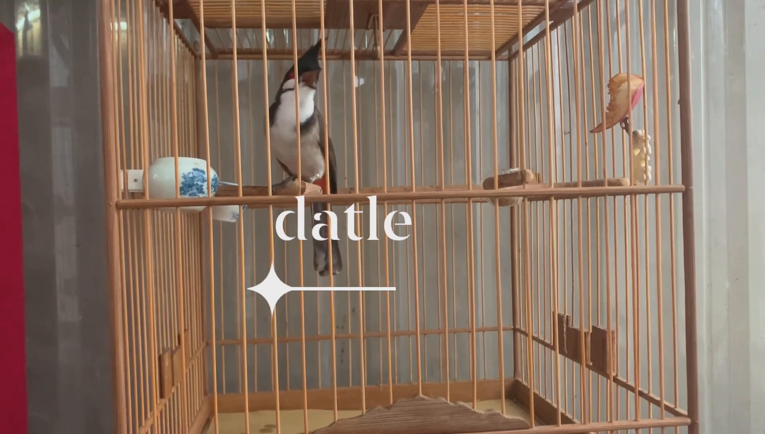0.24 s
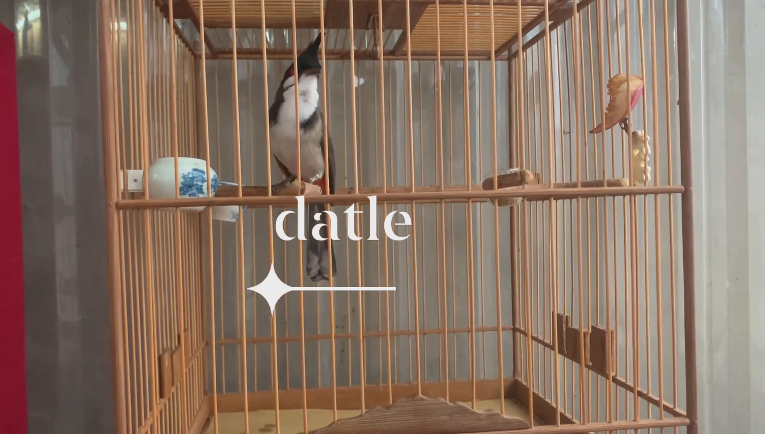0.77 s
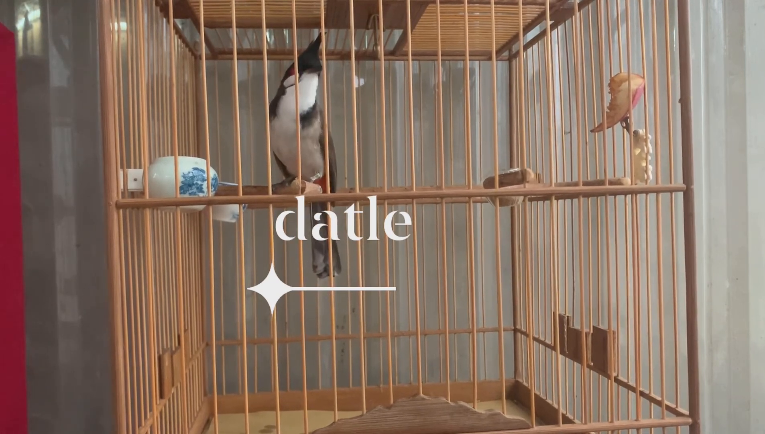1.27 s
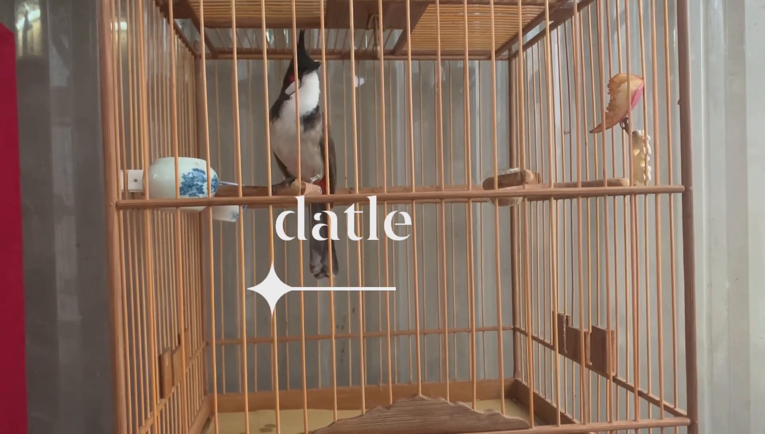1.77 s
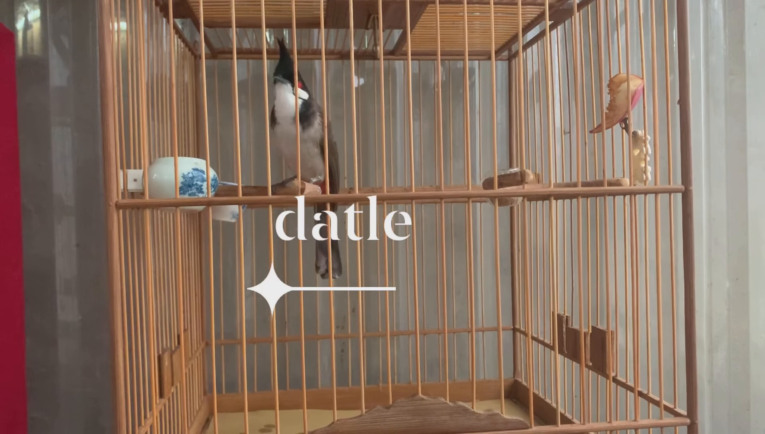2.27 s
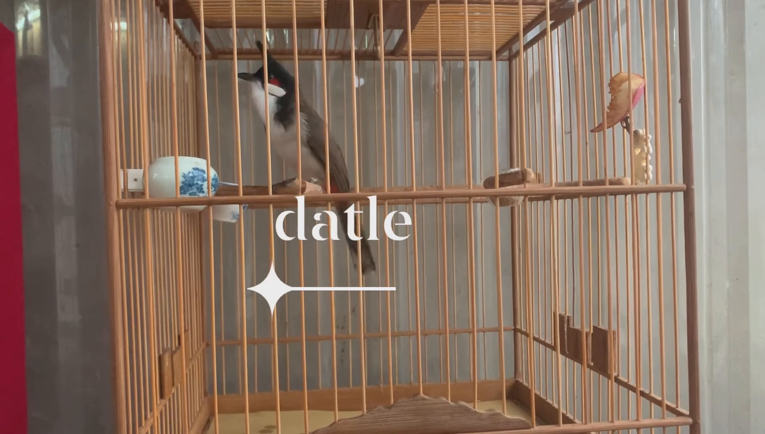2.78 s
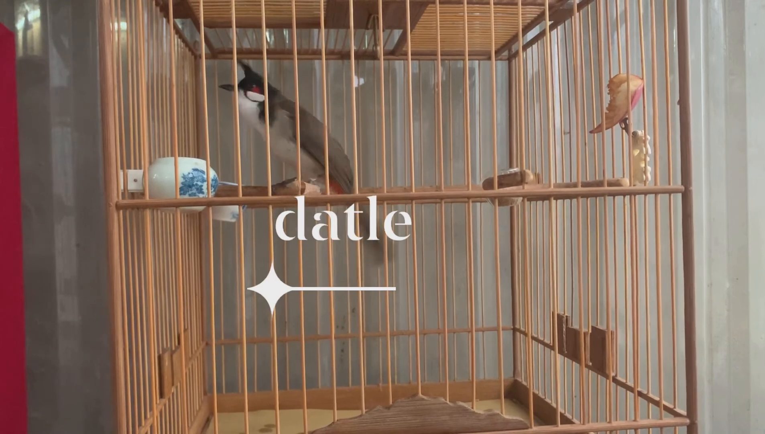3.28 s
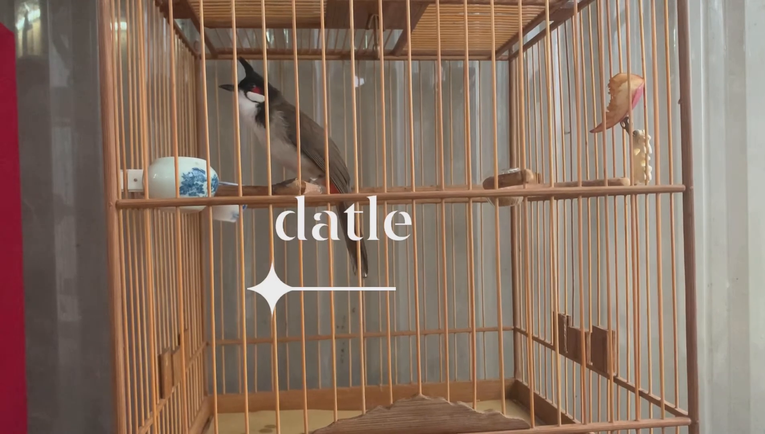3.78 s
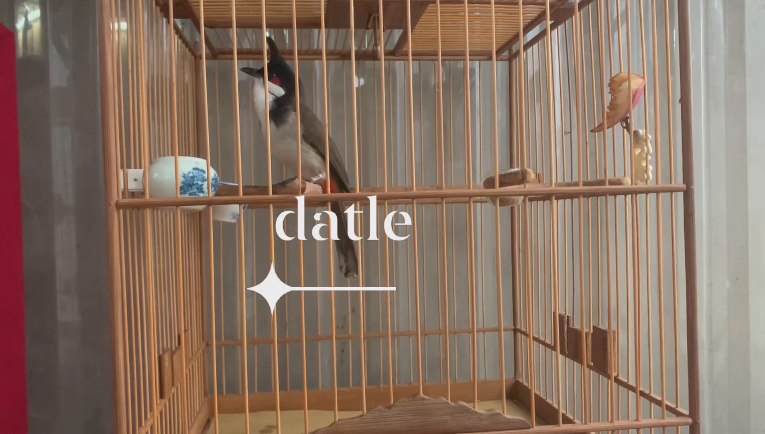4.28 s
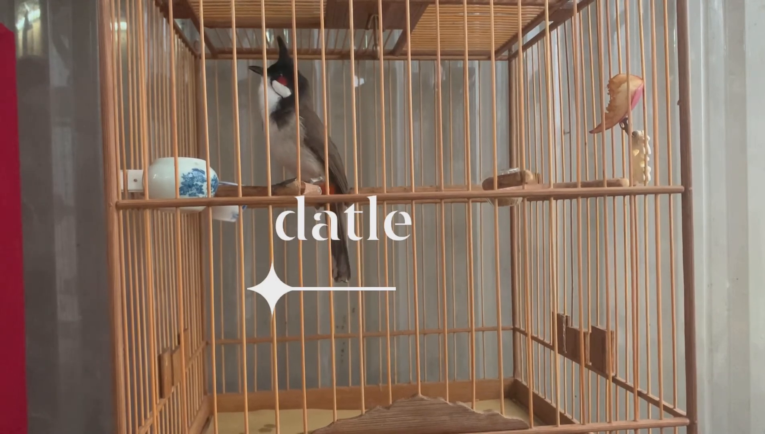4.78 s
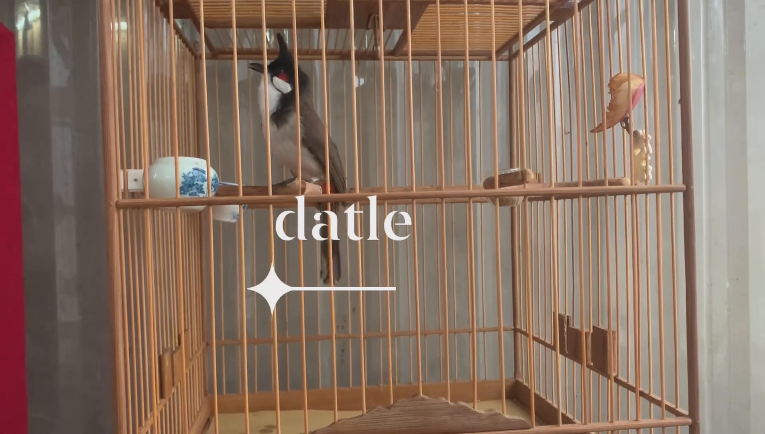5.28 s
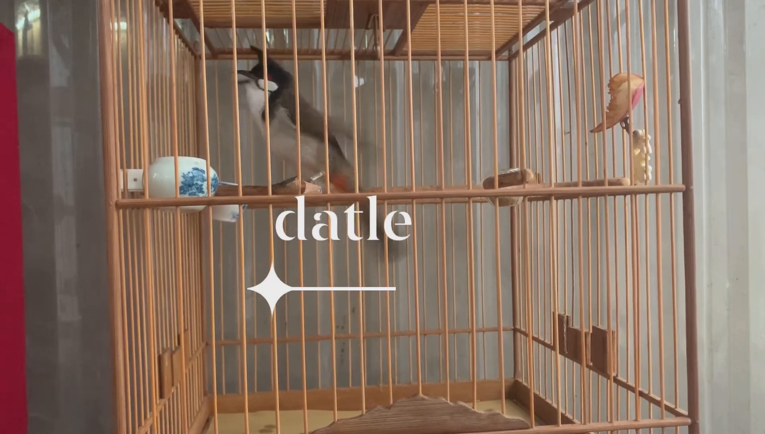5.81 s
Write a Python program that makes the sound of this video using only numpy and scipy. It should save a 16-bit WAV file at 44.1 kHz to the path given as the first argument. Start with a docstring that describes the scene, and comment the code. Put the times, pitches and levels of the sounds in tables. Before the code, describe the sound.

Close stereo pickup of a caged bird in a reverberant room above quiet street rumble. The fading wash of an earlier call leads into fast fluting whistles while a car horn honks faintly outside. The phrases relax into sliding notes, stop briefly, return with a small two-note figure, then, after a gap with distant birds and a bright chip, resume in strong whipped whistles with ringing echoes.

```python
"""A bulbul sings in a bamboo cage in a hard-walled room, over street rumble and steady hiss (shaped noise).
First a wash of an earlier call dies away as a distant two-tone car horn (wavering sines) swells and sinks.
Whips, slurs, shaken warbles and held whistles, at times from both sides of the syrinx, are gliding sines with
weak overtones and rasp; two sharp chips fall among them. Soft hiss returns near 2.3 s, far birds call from
3.2 to 3.9 s, and the song runs on to the end. Near walls, the room and a few ringing resonances answer it."""
import sys
import numpy as np
from scipy import signal
from scipy.fft import rfft, irfft, next_fast_len
from scipy.io import wavfile
from scipy.ndimage import uniform_filter1d, minimum_filter1d, map_coordinates

SR = 44100
rng = np.random.default_rng(int(sys.argv[2]) if len(sys.argv) > 2 else 0)


def to_wav(s):
    """Save 16-bit WAV."""
    ch = np.atleast_2d(s).T  # columns
    pcm = np.round(np.clip(ch, -1, 1) * 32767)  # PCM
    wavfile.write(sys.argv[1], SR, pcm.astype(np.int16))


N = 266805


def amp(db):
    """Decibels to gain."""
    return 10 ** (np.asarray(db) / 20)


def unit(x):
    """Scale to rms 1."""
    return x / np.sqrt(np.mean(x ** 2) + 1e-20)


def along(points, hz):
    """(Hz, value) points read on a log frequency axis."""
    f, v = np.transpose(points)
    return np.interp(np.log(hz + 1), np.log(f + 1), v)


def clock():
    """The time of each sample in seconds."""
    return np.arange(N) / SR


def level_over_time(points):
    """Gain that follows (s, dB) points in straight lines of dB."""
    return amp(np.interp(clock(), *np.transpose(points)))


def wobble(rate):
    """A smooth random curve, rate knots a second."""
    knots = rng.standard_normal(int(N * rate / SR) + 4)
    return map_coordinates(knots, [clock() * rate])


def filtered(x, response):
    """x passed through a complex response of frequency."""
    m = next_fast_len(N + SR // 2)
    hz = np.fft.rfftfreq(m, 1 / SR)
    return irfft(rfft(x, m) * response(hz), m)[..., :N]


def gate(t, start, end, edge):
    """1 between start and end, with soft edges."""
    opening = np.clip(np.minimum(t - start, end - t) / edge + .5, 0, 1)
    return np.sin(np.pi / 2 * opening) ** 2


def rush(spectrum):
    """Stereo noise of rms 1: mid and side shares set how alike the ports are, nearly mono in the bass."""
    # likeness of the two microphone ports, clipped to 0..1: frequency_hz, correlation
    alike = [(60, 1.07), (380, 0.43), (2380, -4.5), (15000, 0.1)]

    def mid_and_side(hz):
        turn = np.arccos(np.clip(along(alike, hz), 0, 1)) / 2
        return amp(along(spectrum, hz)) * [np.cos(turn), np.sin(turn)]

    mid, side = filtered(rng.standard_normal((2, N)), mid_and_side)
    return unit(np.array([mid + side, mid - side]))


def room(x, early_db=5, early_t60=0.082):
    """Dense early reflections (t60 in s) give way to a tail that dies sooner in the treble."""
    # decay of the hard-walled room: frequency_hz, t60_s
    decay_times = [(300, 0.94), (2000, 0.77), (4000, 0.6), (8000, 0.62), (14000, 0.44)]
    hz, t, z = signal.stft(rng.standard_normal((2, SR)), SR, nperseg=256)
    late = amp(-60 * t / along(decay_times, hz)[:, None])
    early = amp(early_db - 60 * t / early_t60)
    tail = signal.istft(z * (late + early), SR, nperseg=256)[1]
    tail = tail / np.linalg.norm(tail[0])
    tail = np.pad(tail, ((0, 0), (SR // 150, 0)))  # the first reflections come 1/150 s late
    return signal.fftconvolve(x[None], tail, axes=1)[:, :N]


def air(air_db=-60):
    """A steady, faint hiss: shaped stereo noise."""
    # colour of the hiss: frequency_hz, relative_level_db
    colour = [(410, -12.5), (700, -1.5), (1590, -1), (2880, -6.5), (3410, -9.5), (4540, -17), (7340, -22.5),
              (8920, -16.5), (14800, -54.5), (15600, -52)]
    return amp(air_db) * rush(colour)


def traffic(tilt_db=1.4):
    """Rumble from outside: low stereo noise of drifting level, a little to the right."""
    # level of the rumble before the tilt: time_s, level_db
    drift = [(0.0, -45.5), (0.641, -51), (4.484, -45), (4.718, -52.5), (5.324, -44), (6.05, -48.5)]
    # colour of the rumble: frequency_hz, relative_level_db
    colour = [(15, -60.5), (25, -25.5), (54, 2.5), (96, -5.5), (128, 0.5), (192, -11), (323, -14.5),
              (492, -17.5), (525, -9.5), (560, -20), (1200, -29.5), (1560, -80), (2640, -120)]
    return level_over_time(drift) * rush(colour) * amp([[-tilt_db], [tilt_db]])


def horn(waver=0.018, fading_db=2):
    """Two horn tones with their overtones, each fading in and out on its way through the street."""
    # the two tones and their overtones, before the swell: pitch_hz, level_db
    partials = [(404, -54.5), (527, -52), (807, -62), (1052, -61), (1215, -57)]
    # swell of the whole blast: time_s, relative_level_db
    swell = [(.27, -14.5), (.38, -0.5), (.82, -0.5), (.95, -8), (1.25, -14), (1.601, -61.5)]
    tones = np.zeros(N)
    for hz, db in partials:
        level = amp(db + fading_db * wobble(19.27))
        cycles = hz * np.cumsum(1 + waver * wobble(43.34)) / SR
        tones += level * np.sin(2 * np.pi * cycles)
    blast = np.sqrt(2) * tones * level_over_time(swell)
    return blast + .5 * room(blast)


def far_birds():
    """Distant calls, sines that glide and waver, arrive only as reverberation."""
    # faint calls; waver is a share of the pitch, pitch that of mid-call:
    # start_s, end_s, pitch_hz, rise_hz_per_s, level_db, waver
    far_calls = [(3.17, 3.398, 2820, 1800, -57, 0.079), (3.624, 3.91, 3293, 1200, -52.5, .05),
                 (3.823, 3.93, 2410, 500, -49.5, .05)]
    t, calls, tremble = clock(), np.zeros(N), wobble(250)
    for start, end, hz, rise, db, waver in far_calls:
        pitch = (hz + rise * (t - (start + end) / 2)) * (1 + waver * tremble)
        phase = 2 * np.pi * np.cumsum(pitch) / SR
        calls += amp(db) * gate(t, start, end, 0.034) * np.sin(phase)
    return room(np.sqrt(2) * calls)


def soft_hiss():
    """A soft high hiss that comes and goes: shaped stereo noise."""
    # colour: frequency_hz, relative_level_db
    colour = [(2000, -14), (4500, -1), (9000, 0.5), (11200, -7.5), (13000, -10.5), (15500, -23)]
    # swell: time_s, level_db
    swell = [(0, -60.5), (.23, -66), (0.552, -65), (0.999, -86), (2.051, -82), (2.301, -69.5), (2.601, -85)]
    return level_over_time(swell) * rush(colour)


def earlier_call():
    """The wash of an earlier call dies away: stereo noise in a band of the song's pitch."""
    # colour: frequency_hz, relative_level_db
    colour = [(1500, -32.5), (2800, -15), (3600, 2), (3950, -8.5), (4400, -34)]
    # fade: time_s, level_db
    fade = [(0, -49.5), (.17, -52.5), (.26, -55), (0.601, -100)]
    return level_over_time(fade) * rush(colour)


def rings(x):
    """Narrow resonances store the notes that hit them and let go slowly, in a different phase at each port."""
    # resonances of the room: frequency_hz, t60_s, relative_level_db
    resonances = [(1637, .8, -2), (2125, .6, 0), (2240, .85, -5), (2778, .9, -2), (3882, .55, 3)]
    t = np.arange(SR) / SR
    phases = rng.uniform(0, np.pi / 2, (len(resonances), 2, 1))
    answer = np.zeros((2, SR))
    for (hz, t60, db), phase in zip(resonances, phases):
        even_out = 2 * np.log(1000) / (t60 * SR)  # long rings respond no louder than short ones
        answer += amp(db - 60 * t / t60) * even_out * np.sin(2 * np.pi * hz * t + phase)
    return signal.fftconvolve(x[None], answer, axes=1)[:, :N]


def ports(x, lead=5.98):
    """The direct sound and its near-wall copies reach the two microphone ports at different times."""
    # near walls: delay_s, gain, left_port_lead_samples
    walls = [(.004, 0.5, 3), (.00758, .27, -4.5), (0.0128, .2, 14.5)]

    def arrival(hz, delay, lag):
        port_delay = delay + np.array([[-.5], [.5]]) * lag / SR
        return np.exp(-2j * np.pi * hz * port_delay)

    def all_arrivals(hz):
        direct = arrival(hz, 0, lead)  # lead in samples
        return direct + sum(gain * arrival(hz, delay, lag) for delay, gain, lag in walls)

    return filtered(x, all_arrivals)


def chips(jitter=0.022):
    """Short, bright chips: clusters of partials that start at once and fade quickly."""
    # chips, before the gains of the scene: start_s, pitch_hz, level_db, t60_s
    sharp_chips = [(1.379, 4220, -41.5, 0.043), (3.513, 3886, -38, 0.2)]
    # their partials: pitch_multiple, relative_level_db
    partials = [(1, 9.5), (1.52, -13.5), (2, -6), (2.471, -19), (3.12, -24)]
    t, sound = clock(), np.zeros(N)
    cycles = np.cumsum(1 + jitter * wobble(600)) / SR
    for start, hz, db, t60 in sharp_chips:
        age = np.maximum(t - start, 0)
        level = amp(db - 60 * age / t60) * (1 - np.exp(-age / 0.0028))
        sound += level * sum(amp(k_db) * np.sin(2 * np.pi * k * hz * cycles) for k, k_db in partials)
    return np.sqrt(2) * sound


def whips(top_share=.8, ease=1.8, attack_s=0.018, attack_db=12, release_s=0.018, release_db=3.5):
    """The pitch shoots up, slows and tips over at the top, while the level swells, holds and sinks."""
    # upward whips; level is that of the hold, before the gains of the scene:
    # start_s, length_s, low_hz, top_hz, level_db, brightness_db
    upward_whips = [ (0.253, 0.044, 1650, 3580, -17, 0), (0.54, 0.043, 2347, 3496, -15, -1.5),
                    (1.249, 0.066, 2195, 3674, -23, -6), (3.949, 0.054, 1620, 4052, -15, 1),
                    (4.356, 0.044, 2150, 3866, -20, -5), (4.604, 0.061, 1782, 4137, -13.5, 2.5),
                    (4.912, 0.055, 2600, 3567, -29.5, 5), (4.986, 0.042, 2332, 3640, -29.5, -3),
                    (5.842, 0.058, 1806, 4122, -14, 3), ]
    for start, length, low_hz, top_hz, db, bright_db in upward_whips:
        age = np.arange(0, length, 1 / SR)
        climb = 1 - np.abs(1 - age / (top_share * length)) ** ease
        attack = attack_db * np.maximum(1 - age / attack_s, 0)
        release = release_db * np.maximum(1 - (length - age) / release_s, 0)
        yield start + age, low_hz * (top_hz / low_hz) ** climb, db - attack - release, bright_db, True


def slurs():
    """One smooth bend through three pitches that grows or fades evenly."""
    # slurred notes; level is that of mid-note, before the gains of the scene:
    # start_s, length_s, first_hz, middle_hz, last_hz, level_db, swell_over_note_db, brightness_db
    slurred_notes = [ (0.3, 0.043, 3310, 2898, 2798, -12, 5, -0.5),
                     (0.427, 0.037, 1790, 2330, 1713, -25.5, 5, -2.5),
                     (0.465, 0.027, 1910, 2473, 2650, -21, 7.5, -9.5),
                     (0.623, 0.036, 2052, 2150, 2704, -23, 11.5, -1),
                     (0.72, 0.008, 3760, 3430, 3400, -19.5, -2.5, -2.5),
                     (0.78, 0.028, 2814, 2751, 2590, -14, -5.5, -6.5),
                     (0.784, 0.085, 3032, 3810, 3886, -21.5, -3.5, 0.5),
                     (0.824, 0.047, 2155, 2142, 2015, -24, -4, -4.5),
                     (1.583, 0.11, 1857, 1930, 1690, -40.5, -3, 3),
                     (2.68, 0.048, 1274, 1537, 2013, -34.5, 19.5, 6.5),
                     (2.734, 0.0346, 2090, 2237, 1952, -19.5, -3, 1),
                     (4.786, 0.022, 1404, 1550, 1663, -41.5, 18, 3),
                     (5.117, 0.043, 1494, 1976, 2336, -29, 22, 3),
                     (5.166, 0.08, 2722, 3079, 2860, -25.5, -9.5, 6),
                     (5.274, 0.028, 1576, 1904, 2324, -20, 18.5, 3),
                     (5.303, 0.022, 2423, 2525, 2297, -15.5, 2, 1), ]
    for start, length, first_hz, middle_hz, last_hz, db, swell_db, bright_db in slurred_notes:
        age = np.arange(0, length, 1 / SR)
        u = age / length - .5  # -0.5 at the start, 0.5 at the end
        bow = 2 * (first_hz + last_hz - 2 * middle_hz) * u ** 2
        hz = middle_hz + (last_hz - first_hz) * u + bow
        yield start + age, hz, db + swell_db * u, bright_db, True


def whistles(scoop_s=0.011):
    """A quick slide from above or below onto a steady pitch whose level falls (or grows) as it is held."""
    # held whistles; entry is the starting pitch over the held one, level is before the gains of the scene:
    # start_s, length_s, pitch_hz, level_db, fade_db_per_s, brightness_db, entry
    held_whistles = [ (0.875, 0.054, 1625, -28.5, 61, 1, 1.24), (1.051, 0.1, 2405, -22.5, 57, -12, 0.83),
                     (1.172, 0.085, 3240, -28.5, 79, -7.5, 1.03), (1.461, 0.12, 2790, -26.5, 84, 3, 0.89),
                     (1.56, 0.014, 2280, -29, 11, -10, 0.97), (1.615, 0.06, 2215, -31, 47, 6, 0.95),
                     (3.937, 0.013, 1470, -36.5, 17, 22, 0.99), (4.827, 0.072, 2735, -27, -1.5, 4, 1.04),
                     (5.197, 0.07, 1490, -37.5, 20.5, -5.5, 1.24),
                     (5.322, 0.18, 1625, -26.5, 101, -3, 1.63), ]
    for start, length, hz, db, fade, bright_db, entry in held_whistles:
        age = np.arange(0, length, 1 / SR)
        scoop = 1 + (entry - 1) * np.exp(-age / scoop_s)
        yield start + age, hz * scoop, db - fade * age, bright_db, False


def bulbul(jitter=0.0052, glide_jitter=0.0384, shimmer_db=2.5, edge=0.006, rasp_db=-33, smear=0.15, bloom=0.31):
    """Each note is a whistle with weak, hoarse overtones: clean when held, rough when it glides or shakes."""
    # fast pitch shakes of the gliding notes; depth is a share of the pitch:
    # start_s, end_s, rate_hz, depth, added_rasp_db
    warbles = [(0.258, 0.323, 98.4, 0.18, 11.5), (0.428, 0.498, 133.8, 0.073, 10.5),
               (0.547, 0.587, 113, 0.1, 4.5), (0.813, 0.872, 107.4, 0.06, 1.5),
               (1.596, 1.699, 129.8, 0.11, 10.5), (4.636, 4.683, 136.5, 0.047, 2.5)]
    # the whistle's overtones, before beak and effort: pitch_multiple, relative_level_db
    overtone_levels = [(2, -29.5), (3, -36.5)]
    # how well beak and throat pass the overtones: frequency_hz, gain_db
    beak = [(3300, 17), (4200, -5.5), (5100, -16), (6800, -8.5), (8300, -0.5), (10300, 7.5), (11500, -38.5),
            (13500, -3), (15500, -8)]
    # colour of the hoarse noise on each note: frequency_hz, relative_level_db
    rasp_colour = [(1500, -21), (3300, 11.5), (4200, 4.5), (5100, -15.5), (6300, -6.5), (8500, -7),
                   (10200, 3.5), (11300, -11.5), (13500, -4), (15500, -14.5)]
    shake_pulse_db = 26  # level swing per unit of depth: each shake is loudest as its pitch falls
    held_rasp_db = -1  # rasp of held whistles, relative to rasp_db

    t, song, hoarseness = clock(), np.zeros(N), np.zeros(N)
    bend, pulse_db, shake_db = np.zeros(N), np.zeros(N), np.zeros(N)
    for start, end, rate, depth, added_db in warbles:
        shake = gate(t, start, end, 0.0071)
        cycle = 2 * np.pi * rate * (t - start)
        bend += depth * shake * np.sin(cycle)
        pulse_db -= shake_pulse_db * depth * shake * np.cos(cycle)
        shake_db += added_db * shake

    tremble, flutter_db = wobble(450), shimmer_db * wobble(250)
    scatter = smear * wobble(1400)  # uneven cycles broaden the overtones
    for s, hz, db, bright_db, gliding in [*whips(), *slurs(), *whistles()]:
        on = (t > s[0] - edge) & (t < s[-1] + edge)
        contour = np.interp(t[on], s, hz)
        slope = np.abs(np.gradient(np.log(contour))) * SR
        speed = uniform_filter1d(slope, size=1200)  # relative pitch change a second
        roughness = glide_jitter * np.tanh(speed / 10) * tremble[on]
        pitch = contour * (1 + jitter * tremble[on] + gliding * (bend[on] + roughness))
        phase = 2 * np.pi * np.cumsum(pitch) / SR
        level_db = np.interp(t[on], s, db) + flutter_db[on] + gliding * pulse_db[on]
        level = amp(level_db) * gate(t[on], s[0], s[-1], edge)
        overtones = sum(amp(k_db + along(beak, k * pitch)) * np.sin(k * phase + scatter[on])
                        for k, k_db in overtone_levels)
        effort = amp(bright_db) * (10 * level + 1e-9) ** bloom  # louder notes are brighter
        song[on] += np.sqrt(2) * level * (np.sin(phase) + effort * overtones)
        note_rasp_db = bright_db + shake_db[on] if gliding else held_rasp_db
        hoarseness[on] += level * amp(note_rasp_db)
    rasp = unit(filtered(rng.standard_normal(N), lambda hz: amp(along(rasp_colour, hz))))
    return song + amp(rasp_db) * hoarseness * rasp


def scene(direct_db=-4.0, ring_db=5):
    """The bird close to the microphone, its room, and the world outside."""
    # as the bird turns its head away, more of the song goes to the room: time_s, room_send_db
    head_turn = [(0.301, -15), (0.786, -5), (0.86, -4), (1.396, 2.5), (2.699, -7.5), (3.997, -5),
                 (4.391, -1.5), (4.632, -5.5), (5.0, 8.5), (5.3, -5.5), (5.869, -8.5)]
    outside = air() + traffic() + horn() + far_birds()
    haze = soft_hiss() + earlier_call()
    song = bulbul() + chips()
    spill = song * level_over_time(head_turn)
    answer = room(spill) + amp(ring_db) * rings(spill)
    return outside + haze + answer + amp(direct_db) * ports(song)


def record(dry, ceiling=.8, top_hz=15750):
    """A limiter holds the loudest peaks; the recorder keeps nothing above its band limit."""
    needed = np.minimum(1, ceiling / (np.abs(dry).max(axis=0) + 1e-9))
    gain = uniform_filter1d(minimum_filter1d(needed, size=512), size=256)
    return filtered(dry * gain, lambda hz: hz < top_hz)


dry = scene()
out = record(dry)
to_wav(out)
```